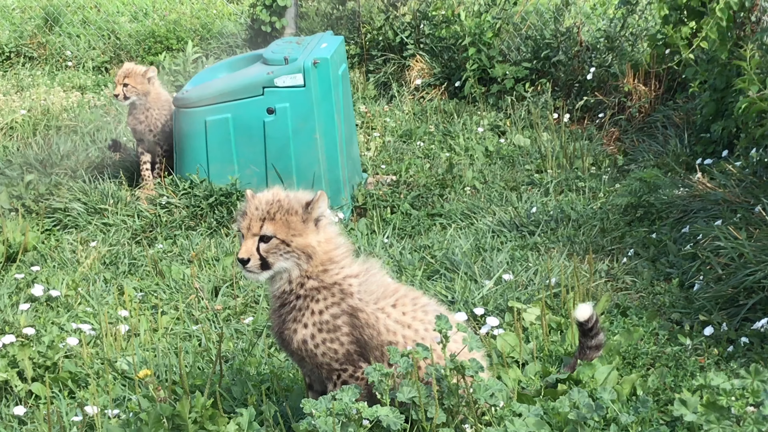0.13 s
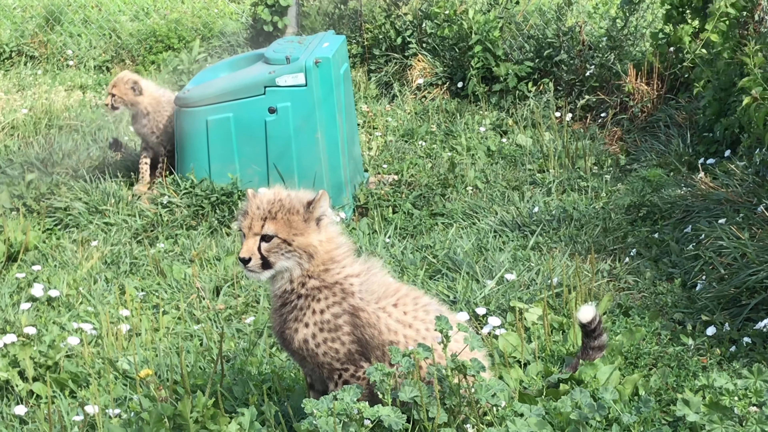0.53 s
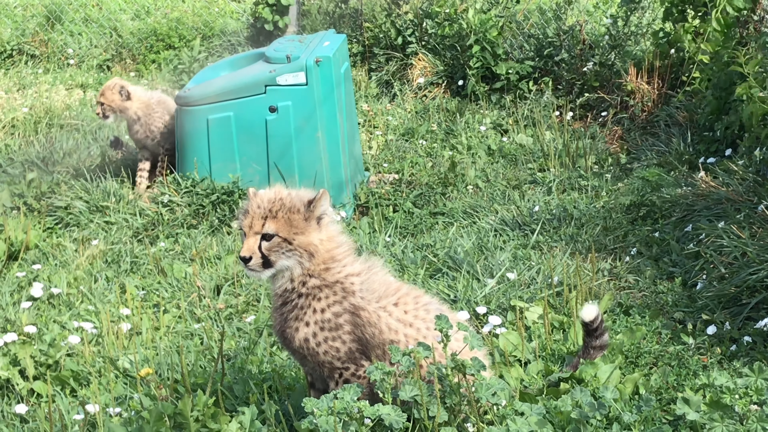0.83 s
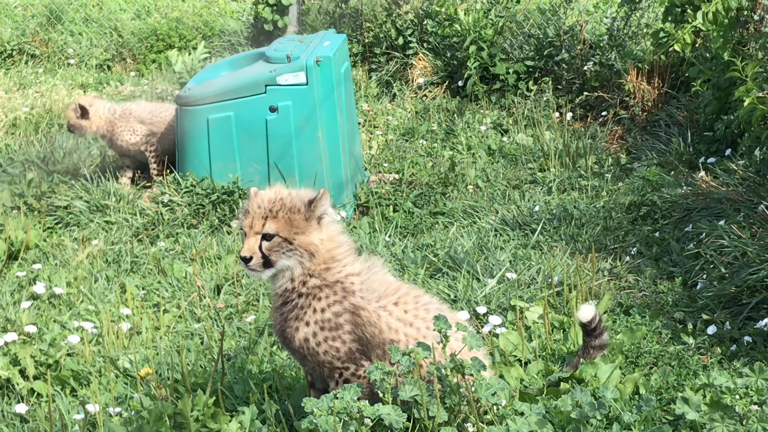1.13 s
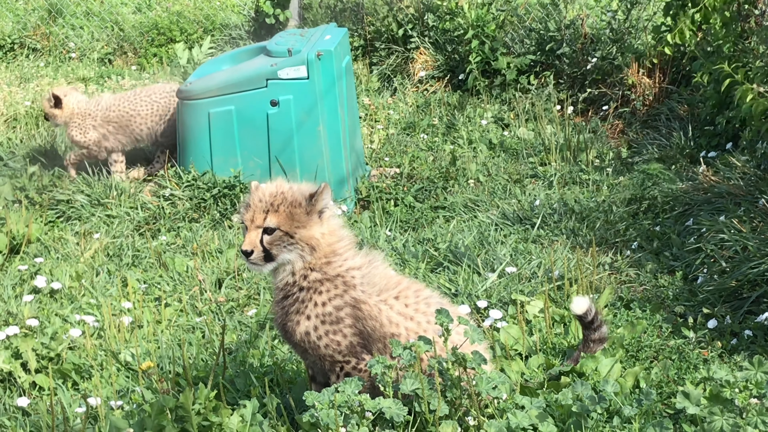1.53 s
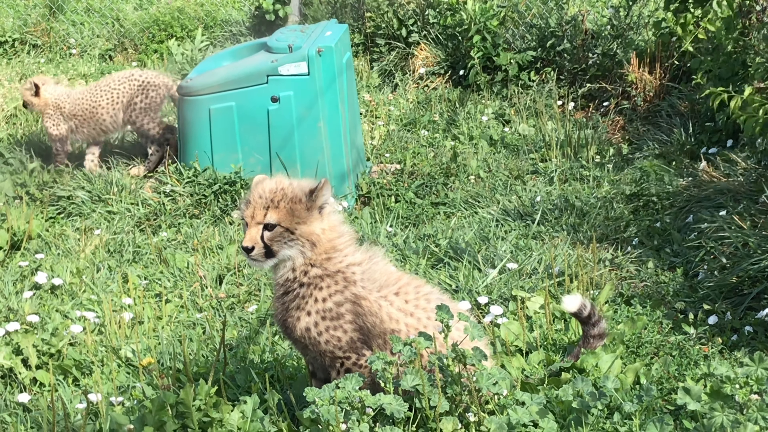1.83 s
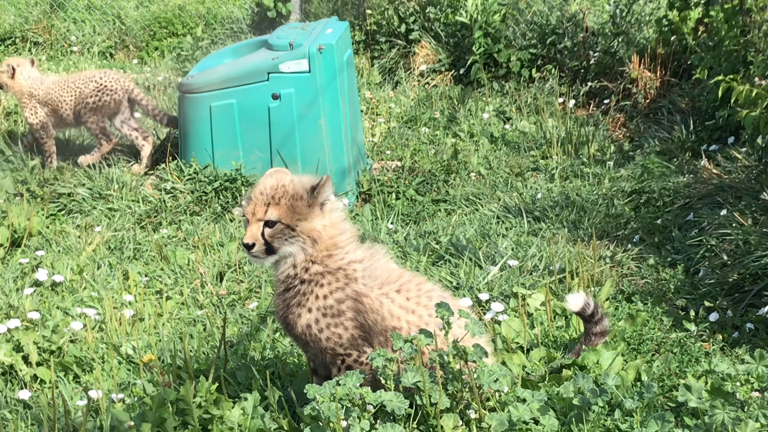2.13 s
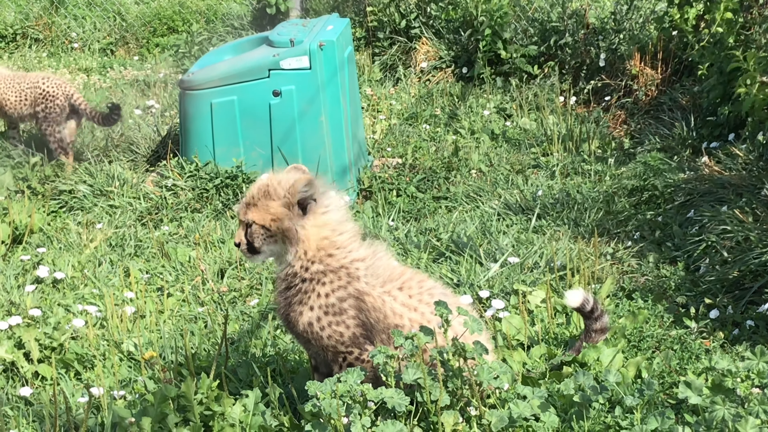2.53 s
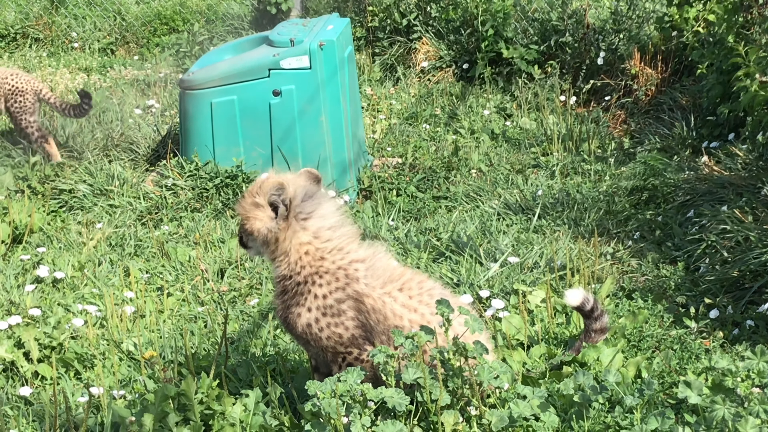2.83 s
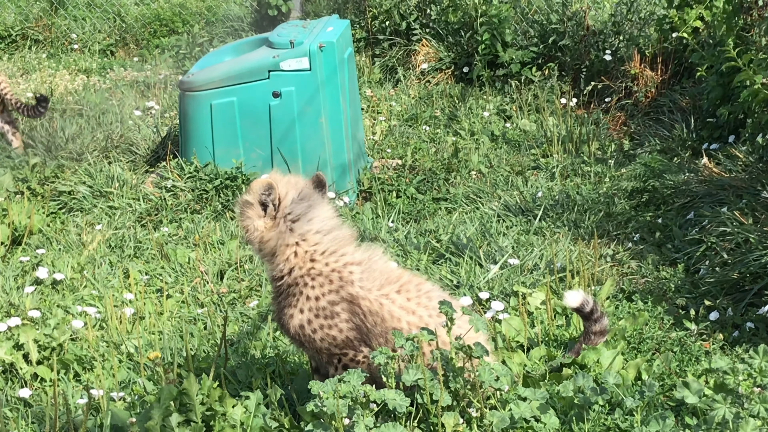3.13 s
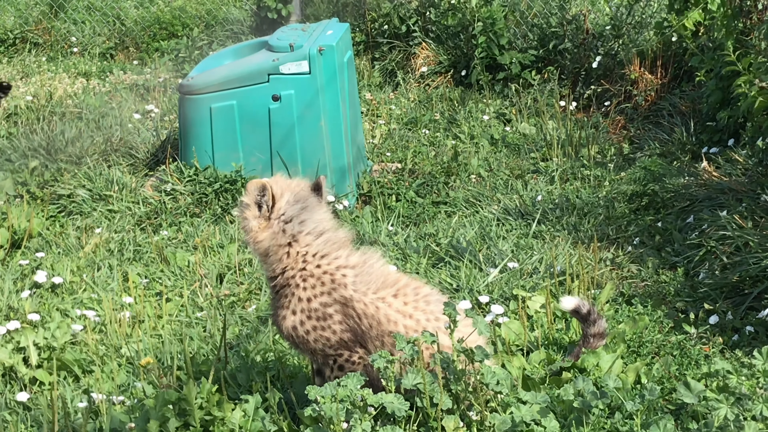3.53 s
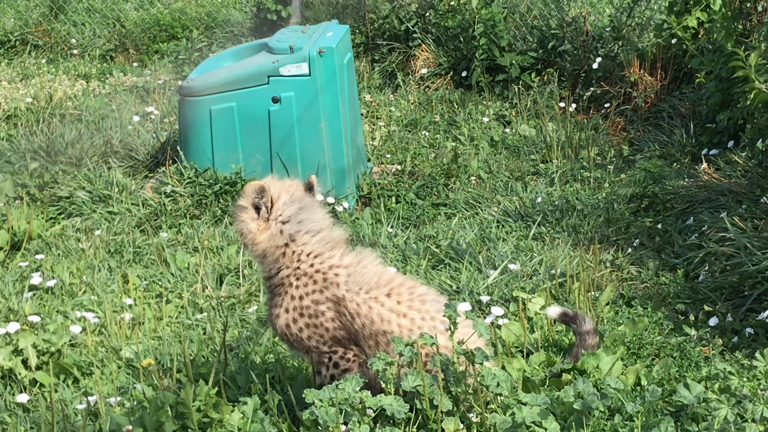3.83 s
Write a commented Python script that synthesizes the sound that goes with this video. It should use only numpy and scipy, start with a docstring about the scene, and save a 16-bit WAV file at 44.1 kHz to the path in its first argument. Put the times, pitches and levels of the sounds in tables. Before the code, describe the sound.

Pulsed churring and thin meows from a cheetah cub, with light wind and dull microphone bumps.

```python
"""A cheetah cub on a lawn. Soft outdoor hiss, light wind on the microphone and a ticking insect open
the scene and run throughout, with the odd bump and far bird. At 0.5 s the cub churrs in short arched
syllables, each snapped shut in the throat, then holds the throat open for a thin meow. It calls again
at 2.2 s, and a distant bird trills through that second meow. From 3.4 s the microphone takes a run
of dull bumps, and a faint third churr follows under the last of them."""
import sys
import numpy as np
from scipy import signal
from scipy.fft import rfft, irfft
from scipy.io import wavfile

SR = 44100
rng = np.random.default_rng(int(sys.argv[2]) if len(sys.argv) > 2 else 0)


def generate_wav(signal):
    """Clip the signal to [-1, 1] and save it as 16-bit WAV at the path in sys.argv[1]."""
    frames = np.transpose(np.atleast_2d(signal))
    scaled = np.clip(frames, -1, 1) * 32767
    pcm = np.round(scaled).astype(np.int16)
    wavfile.write(sys.argv[1], SR, pcm)


N = 176400
TIME = np.arange(N) / SR

# The cub's churr syllables: (start [s], closing snap [s], start pitch [Hz], top pitch [Hz],
# fundamental [dB], second harmonic [dB], upper harmonics before throat colour [dB])
SYLLABLES = [ (0.529, .539, 458, 480, -49.5, -55, -87), (0.576, 0.592, 475, 506, -47.5, -53, -71),
             (0.625, 0.646, 480, 540, -49, -61, -73), (.672, 0.698, 546, 653, -50, -63, -70),
             (0.731, 0.754, 630, 722, -54, -55, -60), (0.783, .813, 575, 775, -53, -49, -58),
             (0.84, .8626, 682, 789, -55.5, -42.5, -50), (.896, 0.921, 701, 800, -56, -42, -48),
             (.95, 0.9777, 677, 817, -53.5, -47, -52.5), (1.012, 1.038, 728, 791, -57, -44, -52.5),
             (1.07, 1.096, 695, 812, -53.5, -48.5, -55.5), (1.129, 1.155, 718, 829, -50.5, -46, -48.5),
             (1.188, 1.22, 782, 878, -49, -49.5, -48), (1.251, 1.2838, 727, 823, -51.5, -50, -59),
             (1.311, 1.3473, 690, 802, -53.5, -47, -60.5), (1.374, 1.404, 708, 823, -51, -45.5, -52.5),
             (1.439, 1.4774, 728, 823, -50.5, -48, -55.5), (2.246, 2.2636, 499, 574, -46.5, -50, -56),
             (2.296, 2.315, 566, 740, -48.5, -41.5, -47), (2.343, 2.374, 595, 783, -53.5, -47.5, -54),
             (2.405, 2.432, 665, 794, -56, -47, -54), (2.459, 2.497, 708, 821, -56, -48, -54),
             (2.527, 2.562, 718, 829, -55, -46.5, -52), (2.586, 2.622, 791, 863, -52.5, -47.5, -52),
             (3.674, 3.698, 542, 644, -55.5, -57, -67.5), (3.736, 3.76, 617, 775, -57, -57, -69.5),
             (3.779, 3.824, 624, 754, -62.5, -60.5, -72), (3.865, 3.884, 680, 716, -61, -61, -75)]
ATTACK_S, SNAP_S = .013, .0056   # how fast the throat opens and snaps shut


def from_db(db):
    """Decibels to gain."""
    return 10 ** (np.asarray(db) / 20)


def rms_one(x):
    """Scale to unit rms."""
    return x / np.sqrt(np.mean(x ** 2) + 1e-20)


def at_hz(points, hz):
    """Read an EQ curve on a log-frequency axis."""
    p = np.array(points)
    return np.interp(np.log(np.maximum(hz, 1)), np.log(np.sort(p[:, 0])), p[:, 1])


def butter(x, hz, kind, order=2):
    """Butterworth filter."""
    return signal.sosfilt(signal.butter(order, np.clip(hz, 10, .45 * SR), kind, fs=SR, output="sos"), x)


def drift(hz, size=N):
    """Random modulator of unit rms, low-passed at hz."""
    return rms_one(butter(rng.standard_normal(size + SR // 10), hz, "low")[SR // 10:])


def coloured(spectrum):
    """Noise of unit rms shaped by an EQ curve."""
    gain = from_db(at_hz(spectrum, np.arange(N // 2 + 1) * SR / N))
    return rms_one(irfft(rfft(rng.standard_normal(N)) * gain, N))


def add(out, s, x):
    """Mix x in at time s."""
    i = int(max(s, 0) * SR)
    out[i:i + len(x)] += x[:max(N - i, 0)]


def air():
    """A bed of soft outdoor hiss with a slight flicker."""
    # Colour of the hiss: (frequency [Hz], relative level [dB])
    spectrum = [(420, 1), (560, -6.5), (1100, -7.5), (2000, -13), (5000, -14.5), (6700, -17), (7800, -21),
                (10500, -25.5), (15800, -19.5)]
    return coloured(spectrum) * from_db(-59.5 + .65 * drift(65))


def wind():
    """Gusts buffet the microphone with a lumpy low rumble."""
    # Colour of the rumble: (frequency [Hz], relative level [dB])
    rumble = [(28, -14), (48, 2), (72, 2), (110, -2), (170, -8), (260, -15), (400, -23), (1500, -70)]
    # Rise and fall of the wind: (time [s], level [dB])
    swells = [(.07, -60), (.19, -56.5), (.245, -44), (.30, -53.5), (.6, -63), (.72, -51.5), (1.1, -54.5),
              (1.18, -44.5), (1.32, -54), (1.9, -55.5), (2.2, -61.5), (2.9, -50.5), (3.25, -56.5),
              (3.48, -40.5), (3.53, -36.5), (3.72, -37), (3.79, -45.5), (4.0, -54.5)]
    gust_db, gust_hz = 3, 18.4
    return coloured(rumble) * from_db(np.interp(TIME, *np.transpose(swells)) + gust_db * drift(gust_hz))


def insect():
    """An insect in the grass ticks fast and evenly at the top of hearing."""
    # Colour of the ticks: (frequency [Hz], relative level [dB])
    spectrum = [(10500, -12), (12300, -1), (13700, -3), (15500, 1.5)]
    start_s, ticks_per_s, tick_s = .0701, 37.242, .0014
    from_tick_s = (((TIME - start_s) * ticks_per_s + .5) % 1 - .5) / ticks_per_s
    ticks = np.exp(-(from_tick_s / tick_s) ** 2)
    return coloured(spectrum) * ticks * from_db(-62 + 1.8 * drift(15))


def birds():
    """Far birds whistle and chip, and sing a high, uneven trill of rising two-tone notes."""
    # Single calls: (start [s], length [s], start pitch [Hz], end pitch [Hz], level [dB])
    calls = [(0.24, 0.2, 2784, 2870, -67), (.465, .035, 9100, 8450, -66), (1.724, 0.043, 9340, 7860, -65.5),
             (2.01, .09, 6560, 6370, -69.5), (3.29, 0.039, 8550, 8940, -67)]
    # The two tones of each trill note: (start pitch [Hz], end pitch [Hz])
    sweeps = [(6540, 7300), (5250, 5600)]
    trill_start_s, step_s, note_s, trill_db = 2.6, .0635, .027, -72.5
    trill = [(trill_start_s + k * step_s + .003 * late, note_s, *sweep, trill_db + accent_db)
             for k, (late, accent_db) in enumerate(rng.standard_normal((17, 2))) for sweep in sweeps]
    out = np.zeros(N)
    for s, length, start_hz, end_hz, db in calls + trill:
        size = int(length * SR)
        waver = .038 if length < .06 else .0062   # short chips are rough, long whistles smooth
        pitch = np.linspace(start_hz, end_hz, size) * (1 + waver * drift(500, size))
        tone = np.sqrt(2) * np.sin(2 * np.pi * np.cumsum(pitch) / SR)
        add(out, s, from_db(db) * np.hanning(size) * tone)
    return out


def rustles():
    """Brief bright brushes of grass."""
    # Each brush: (start [s], length [s], gain [dB])
    brushes = [(1.607, 0.0042, -51.5), (2.607, 0.061, -58.5)]
    out = np.zeros(N)
    for s, length, db in brushes:
        size = int(length * SR)
        add(out, s, from_db(db) * np.hanning(size) * butter(rng.standard_normal(size), 7000, "high"))
    return out


def bumps():
    """Each bump on the microphone is a dull push with a short rub dying away behind it."""
    # Knocks on the microphone: (time [s], peak of the push [dB], low-pass cutoff [Hz])
    knocks = [(.236, -40, 128), (1.168, -41, 350), (1.195, -43.5, 432), (3.421, -37, 268),
              (3.499, -25, 344), (3.542, -42, 285), (3.584, -30.5, 433), (3.612, -28, 570),
              (3.647, -30, 253), (3.688, -30, 240), (3.729, -32, 205)]
    low_cut_hz, rub_gain, rub_t60_s = 95, .43, .1
    out, t = np.zeros(N), TIME[:SR // 5]
    for s, db, hz in knocks:
        push = butter(butter(t == 0, hz, "low", order=6), low_cut_hz, "high")
        friction = butter(butter(rng.standard_normal(len(t)), hz, "low", order=6), low_cut_hz, "high")
        rub = rub_gain * rms_one(friction) * from_db(-60 * t / rub_t60_s)
        add(out, s, from_db(db) * (push / np.abs(push).max() + rub))
    return out


def scatter(x):
    """Ground and bushes throw back a short diffuse tail."""
    wet_db, t60_s, predelay_s = -17.5, .3, .00314
    t = TIME[:SR // 3]
    tail = rng.standard_normal(len(t)) * from_db(-60 * t / t60_s) * (t > predelay_s)
    return from_db(wet_db) * signal.fftconvolve(x, tail / np.sqrt(np.sum(tail ** 2)))[:N]


def throat_db(hz, s):
    """The cub's throat colour at time s, plus a moving mouth resonance strongest early in each call."""
    # Formants of the throat: (frequency [Hz], gain [dB])
    formants = [(1500, 7.5), (1950, -19), (2300, -6.5), (2550, -13.5), (3050, -11.5), (3500, -17),
                (3850, -3.5), (4200, -11), (4620, -0.5), (4950, -10.5), (5280, -6.5), (5900, -17),
                (12000, -43)]
    # Path of the mouth resonance: (time [s], centre [Hz], boost [dB])
    mouth = [(.64, 2600, 13), (.76, 2670, 21.5), (.86, 3080, 14.5), (.92, 3000, 3), (1.44, 2700, -2),
             (1.54, 2750, 10.5), (1.8, 2650, 11.5), (2.27, 2820, 17), (2.5, 2950, 11.5), (2.63, 2860, 9),
             (3.7, 2670, 15)]
    width_hz = 430
    times, centres, boosts = np.transpose(mouth)
    bell = np.exp(-((hz - np.interp(s, times, centres)) / width_hz) ** 2)
    return at_hz(formants, hz) + np.interp(s, times, boosts) * bell


def voice(s, pitch, first_db, second_db, upper_db, tilt_db_per_octave, jitter, rasp):
    """The cub's voice: two plain low harmonics, the rest raspy and coloured by the throat."""
    size = len(pitch)
    shimmer_db, waver_db, rasp_hz = 1.2, 2.5, 200
    pitch = pitch * (1 + jitter * drift(100, size))
    phase = 2 * np.pi * np.cumsum(pitch) / SR
    out = from_db(first_db) * np.sin(phase) + from_db(second_db) * np.cos(2 * phase)
    for k in range(3, 15):
        swell_db = waver_db * drift(14, SR // 2)[:size]   # each harmonic swells and fades on its own
        colour_db = throat_db(k * pitch, s + TIME[:size]) + tilt_db_per_octave * np.log2(k / 3)
        harmonic = np.cos(k * phase + rasp * drift(rasp_hz, size))
        flutter = 1 + rasp * drift(rasp_hz, size) / 2
        out += from_db(upper_db + colour_db + swell_db) * harmonic * flutter
    fades = signal.windows.tukey(size, min(1, .003 * SR / size))
    return np.sqrt(2) * out * fades * from_db(shimmer_db * drift(77, size))


def meows():
    """The throat stays open and the churr runs into a thin, clean tone."""
    # Contours of the two meows: (time [s], pitch [Hz], fundamental [dB], second harmonic [dB],
    # upper harmonics before throat colour [dB])
    first_meow = [(1.496, 656, -67, -43, -67), (1.512, 710, -53, -66, -62), (1.526, 792, -55, -46.5, -71),
                  (1.538, 687, -63, -51, -56), (1.567, 732.5, -65, -50.5, -64.5),
                  (1.577, 820, -59, -50, -78), (1.602, 882, -57, -69, -73), (1.648, 930, -55.5, -54, -64.5),
                  (1.668, 870, -62, -56, -65), (1.706, 884, -59.5, -60, -59.5),
                  (1.802, 838, -62.5, -55.5, -70.5), (1.838, 847, -59.5, -58.5, -65),
                  (1.858, 1108, -53.5, -73, -78), (1.888, 1090, -59, -66, -84)]
    second_meow = [(2.622, 755, -74, -51, -59), (2.642, 766, -64, -46.5, -56), (2.656, 802, -59, -52, -66),
                   (2.677, 795.5, -65, -55.5, -71), (2.703, 828, -62, -51.5, -78),
                   (2.721, 918, -58, -72, -76), (2.825, 1086, -56.5, -68, -68),
                   (2.935, 1136, -56, -68.5, -84), (2.969, 1072, -57, -70, -70),
                   (2.981, 867, -58, -57.5, -75), (3.002, 863, -59, -56.5, -74),
                   (3.021, 1126, -57, -75, -81), (3.048, 860, -65, -81, -90)]
    out = np.zeros(N)
    for contour in (first_meow, second_meow):
        times, *columns = np.transpose(contour)
        t = np.arange(times[0], times[-1], 1 / SR)
        curves = [np.interp(t, times, column) for column in columns]
        add(out, times[0], voice(times[0], *curves, tilt_db_per_octave=-.5, jitter=.0038, rasp=.28))
    return out


def churr_rasp():
    """Hoarse noise in the throat: faint under each syllable, it bursts at the snap and rings out."""
    burst_db, body_db, fall_db_per_s = 11.5, -14, 900
    tilt_db_per_octave, hoarse_db_per_octave = -6.5, 11.5
    out, size = np.zeros(N), SR // 10
    hz = np.fft.rfftfreq(size, 1 / SR)
    highest_hz = max(row[3] for row in SYLLABLES)
    opening = 1 - np.exp(-TIME[:size] / ATTACK_S)
    for start, snap_s, _, top_hz, _, _, upper_db in SYLLABLES:
        octaves_up = np.log2(np.maximum(hz / (3 * top_hz), 1))   # above the third harmonic
        colour_db = throat_db(hz, snap_s) + tilt_db_per_octave * octaves_up
        breath = irfft(rfft(rng.standard_normal(size)) * from_db(colour_db), size)
        breath = butter(breath, 2.8 * top_hz, "high", order=3)
        from_snap_s = start + TIME[:size] - snap_s
        rise = np.maximum(from_db(body_db), np.exp(-(from_snap_s / SNAP_S) ** 2))
        fall = from_db(-fall_db_per_s * np.abs(from_snap_s))
        envelope = opening * np.where(from_snap_s < 0, rise, fall)
        hoarse_db = hoarse_db_per_octave * np.log2(highest_hz / top_hz)   # low syllables are hoarser
        add(out, start, breath * envelope * from_db(upper_db + burst_db + hoarse_db))
    return out


def churr():
    """Each syllable scoops up in pitch, swells, then sags as the closing throat snaps it bright."""
    onset_db, swell_db, release_db_per_s = -6.5, .5, 2605
    top_lead_s, snap_sag, max_sag = .0059, .121, .263   # pitch peaks before the snap; sags are fractions
    out = np.zeros(N)
    for start, snap_s, start_hz, top_hz, first_db, second_db, upper_db in SYLLABLES:
        length = snap_s - start
        t = np.arange(int((length + .02) * SR)) / SR
        top_s = max(length - top_lead_s, ATTACK_S)
        scoop = (1 - start_hz / top_hz) * np.maximum(1 - t / top_s, 0) ** 1.38   # eases into the top
        sag = np.minimum(snap_sag * (np.maximum(t - top_s, 0) / top_lead_s) ** 2, max_sag)
        envelope_db = onset_db * np.exp(-t / ATTACK_S) + swell_db * (np.minimum(t / length, 1) - .5)
        envelope_db -= release_db_per_s * np.maximum(t - length, 0)
        snap = np.exp(-((t - length) / SNAP_S) ** 2)
        syllable = voice(start, top_hz * (1 - scoop - sag),
                         first_db=first_db + envelope_db - 5.5 * snap,
                         second_db=second_db + envelope_db + 2.5 * snap,
                         upper_db=upper_db + envelope_db + 8 * (snap - .5),
                         tilt_db_per_octave=-7.5 + 5 * snap, jitter=.016, rasp=.42)
        add(out, start, syllable)
    return out


def scene():
    """Cub and birds with a short outdoor tail, over hiss, wind, bumps, grass and the insect, in mono."""
    calls = churr() + churr_rasp() + meows() + birds()
    return (air() + calls + scatter(calls) + wind() + bumps() + rustles() + insect())[None]


def record(dry):
    """A quick fade-in after a moment of silence, and a steep cut of the highest treble."""
    start_s, fade_s, cutoff_hz = .069, .004, 15900
    fade_in = np.clip((TIME - start_s) / fade_s, 0, 1)
    low_pass = signal.ellip(12, .2, 70, cutoff_hz, fs=SR, output="sos")
    return signal.sosfilt(low_pass, dry * fade_in + 1e-18)


dry = scene()
out = record(dry)
generate_wav(out)
```